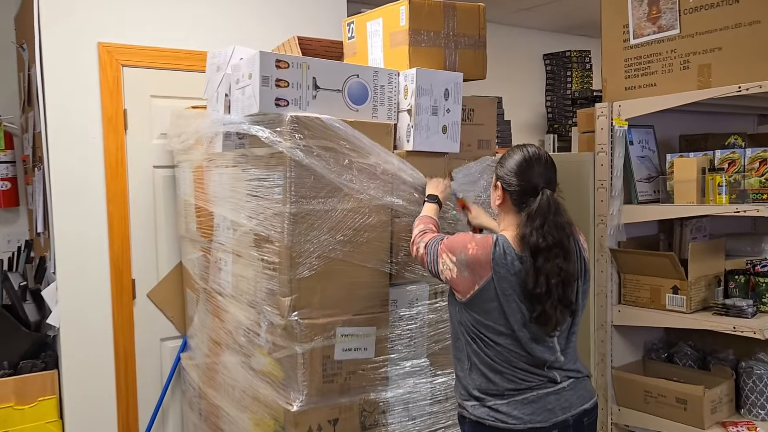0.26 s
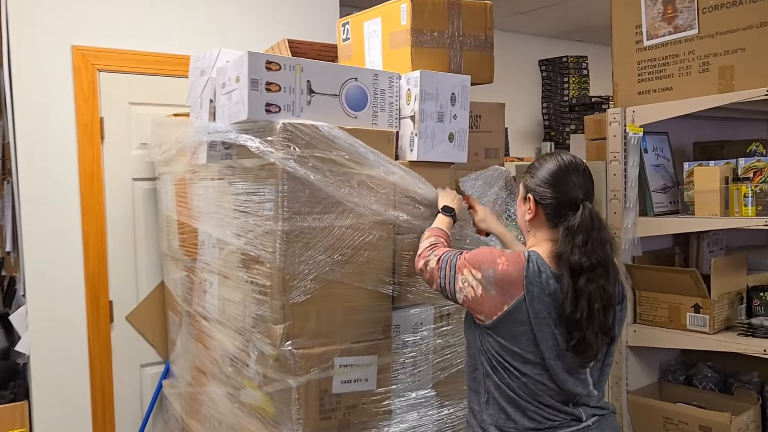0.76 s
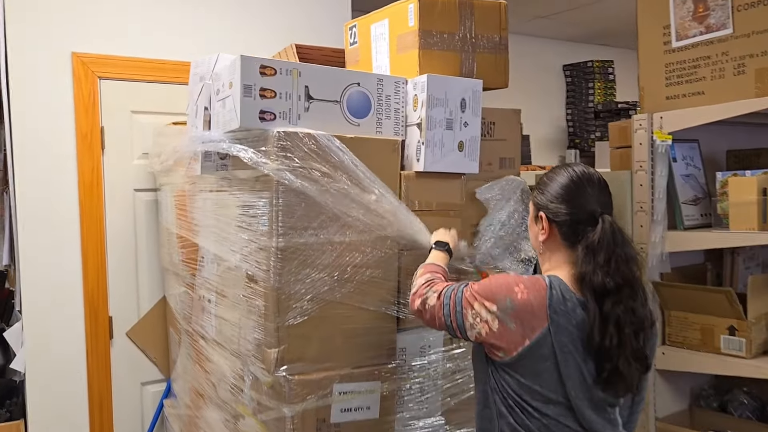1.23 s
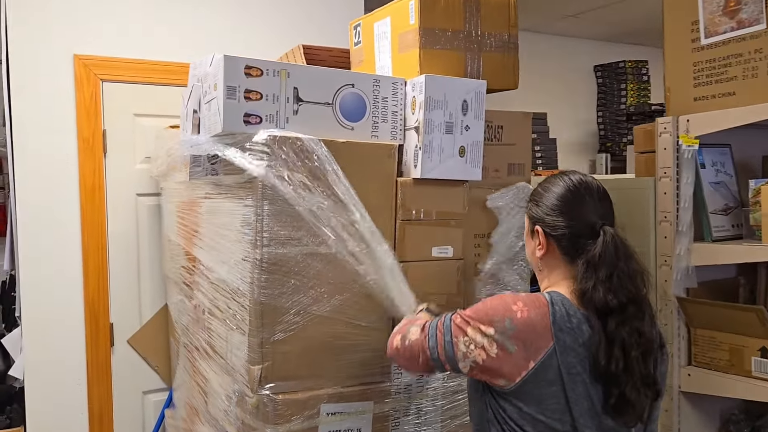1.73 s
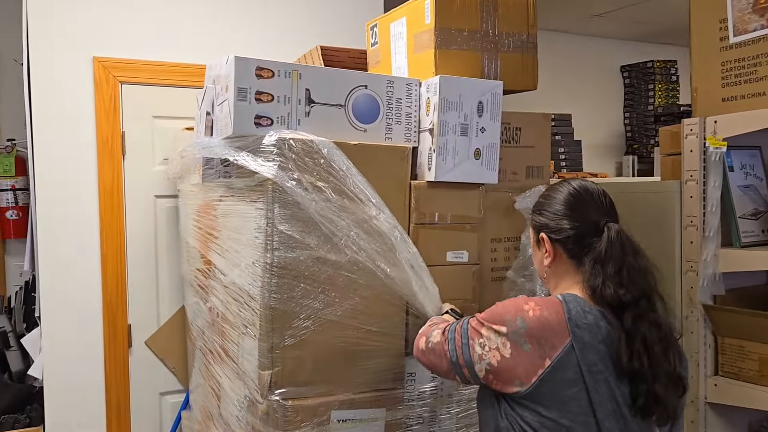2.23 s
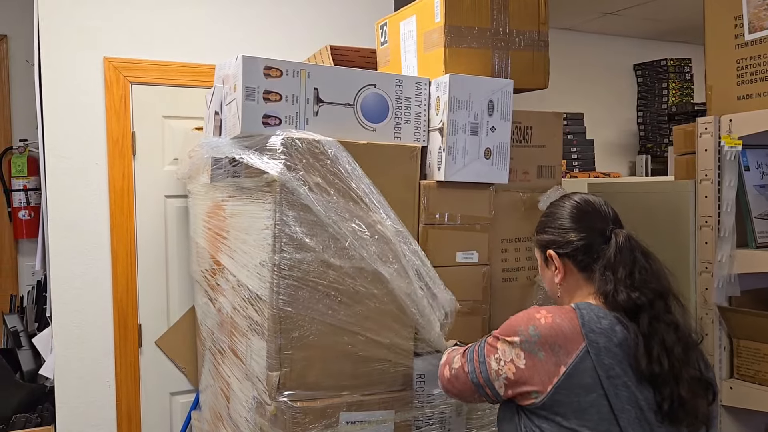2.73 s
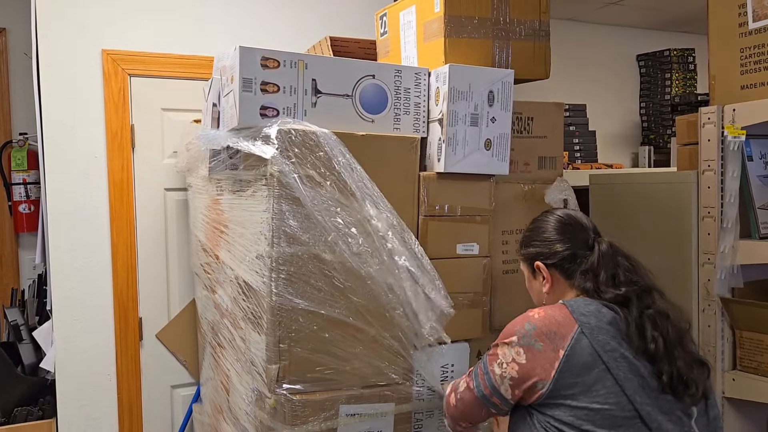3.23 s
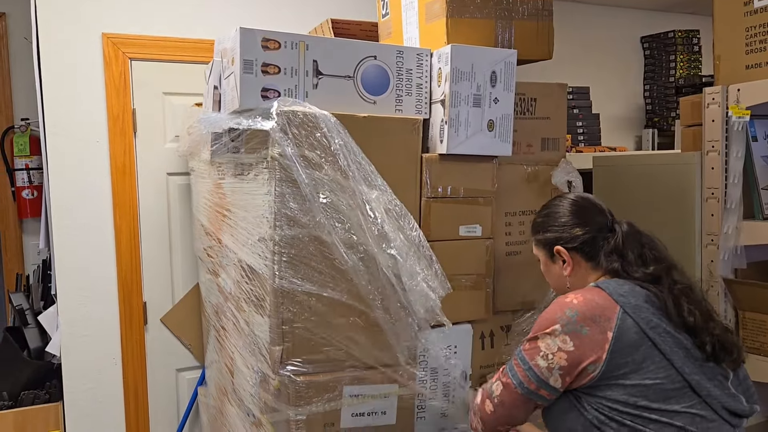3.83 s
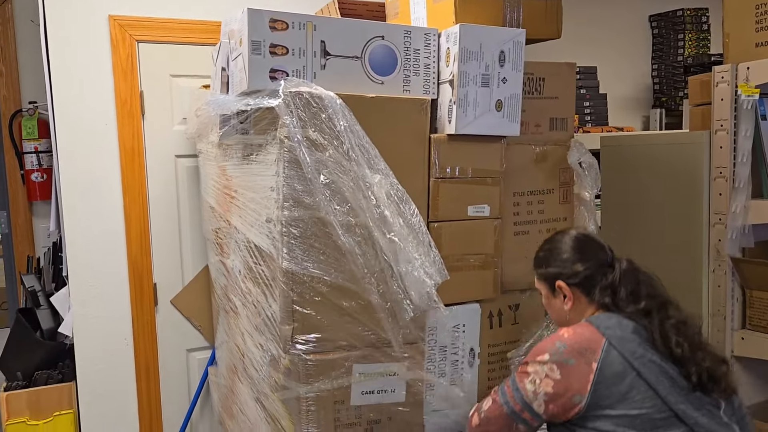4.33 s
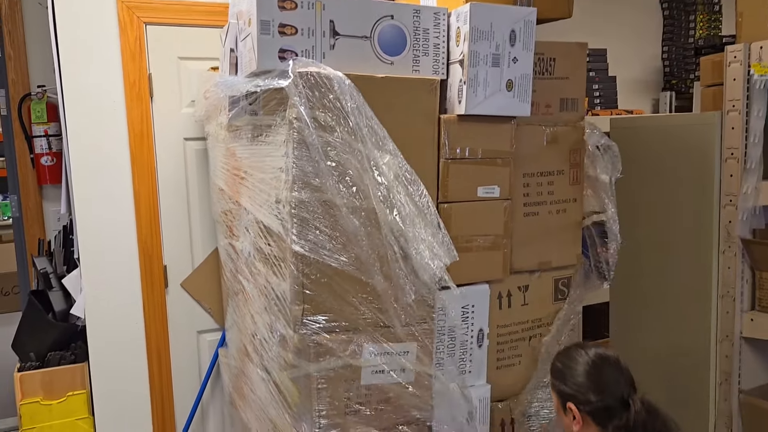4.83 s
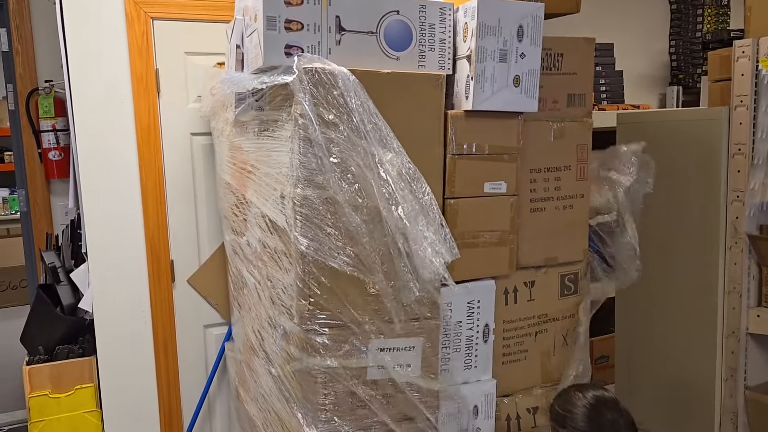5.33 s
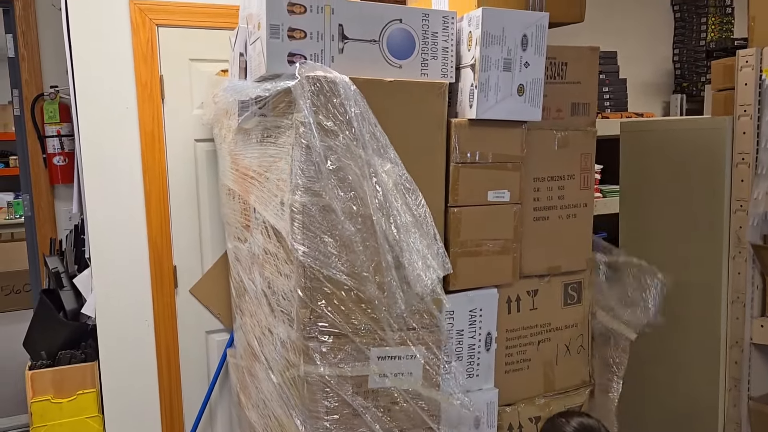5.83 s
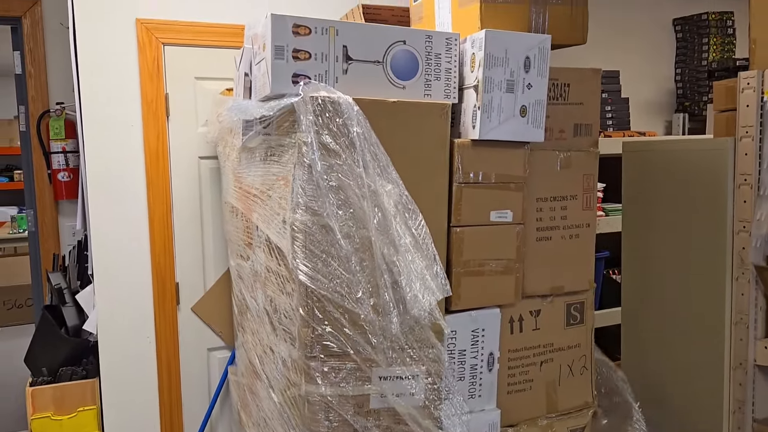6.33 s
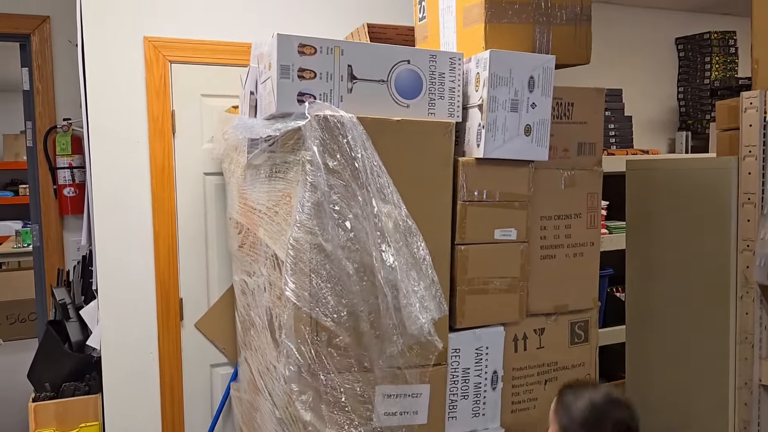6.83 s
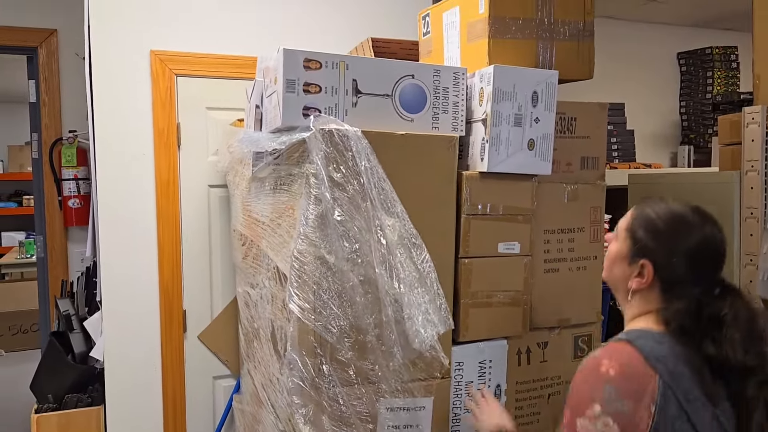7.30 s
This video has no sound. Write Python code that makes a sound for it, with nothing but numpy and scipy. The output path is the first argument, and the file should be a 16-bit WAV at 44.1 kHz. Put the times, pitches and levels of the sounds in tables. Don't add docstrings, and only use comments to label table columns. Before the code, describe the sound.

A woman tears stretch film off a pallet of boxes in a small storeroom, a few steps from a stereo microphone. Dense crinkling comes in uneven tugs, with wads crunching in the hand, folds popping and small creases ticking. Hollow cartons boom softly and the load rumbles. The loudest crackles come just before two seconds and between about five and seven, then it thins to faint ticks.

```python
import sys
import numpy as np
from scipy import signal
from scipy.fft import rfft, irfft, next_fast_len
from scipy.io import wavfile

SR = 44100
rng = np.random.default_rng(int(sys.argv[2]) if len(sys.argv) > 2 else 0)


def magnitude_from_level(level_db):
    exponent = np.asarray(level_db, float) / 20
    return 10 ** exponent


def put_to_file(sound):
    columns = np.atleast_2d(sound).T
    safe = np.clip(columns, -1, 1)
    whole_steps = np.round(safe * 32767)
    wavfile.write(sys.argv[1], SR, whole_steps.astype(np.int16))


N = 333396
HOP = 20

# peak_s, crackle_db, rise_s, fall_s,
# load_db
HAND_TUGS = [(0.0, -42, .01, 0.12, -25), (.194, -32, 0.064, 0.2, -7), (.398, -30.5, 0.03, 0.41, -7.5),
             (0.949, -33, 0.013, 0.62, -11), (1.128, -31, 0.078, 0.24, -10),
             (1.33, -30, 0.4, 0.16, -7.5), (1.728, -20.5, 0.0037, 0.033, -5),
             (1.766, -24, 0.014, 0.12, -5), (1.837, -22, 0.02, 0.061, -1.5), (1.87, -32, 0.03, 0.2, -9),
             (2.232, -40.5, 0.37, 0.21, 4), (2.298, -31, 0.0023, 0.14, 0),
             (2.491, -31, 0.081, 0.4, -9.5), (2.973, -34.5, 0.0084, .3, -20),
             (3.055, -27.5, 0.043, 0.38, -12), (3.28, -33.5, 0.074, 0.052, 9.5),
             (3.505, -31.5, 0.049, 0.084, -15), (3.932, -23.5, 0.079, 0.13, -4.5),
             (4.327, -29.5, 0.033, 0.25, -7), (4.384, -27.5, 0.053, 0.078, -19),
             (4.674, -36, 0.19, 0.15, -27),
             (4.794, -30.5, 0.069, 0.32, -3), (4.993, -24, 0.0037, 0.12, -14),
                 (5.217, -23.5, 0.1, 0.34, -11.5), (5.467, -21.5, 0.0019, 0.062, 3),
                 (5.522, -25, .005, 0.15, -3), (5.576, -26.5, 0.1, 0.16, -13),
                 (5.759, -31, 0.004, 0.05, -8), (5.81, -39.5, .08, 0.11, -4),
                 (5.874, -25, 0.0033, 0.11, -10), (5.924, -27, 0.05, 0.045, -5),
                 (5.987, -30, .002, 0.039, -10), (6.0765, -26.5, 0.002, 0.025, -15),
                 (6.104, -30, .002, 0.042, -12), (6.237, -35.5, 0.11, 0.13, -5.5),
                 (6.555, -21, 0.0022, 0.2, -6), (6.605, -19.5, 0.062, 0.057, -8.5),
                 (6.76, -35, 0.15, 0.35, -8), (6.857, -32, 0.096, 0.12, 1), (6.935, -36, 0.25, 0.047, -24),
                 (7.09, -39, 0.26, 0.17, -7), (7.451, -46, 0.0044, 0.31, -36), (7.56, -37, 0.068, .1, -5),
             (0.424, -27.5, 0.13, 0.05, -7.5), (1.027, -31, .002, 0.11, 8.5),
               (1.171, -28, 0.0066, 0.13, -10), (3.004, -31, .002, .06, -11),
               (.524, -31.5, .002, 0.12, -14), (.262, -33, .002, 0.057, -14), (0.606, -34, .003, .1, -5),
               (3.887, -34, .002, 0.04, -6), (6.966, -32, .004, 0.033, -23), (6.994, -31.5, .004, .03, -15),
               (1.55, -35.5, 0.062, 0.07, -2), (2.62, -39.5, 0.28, 1, -15), (3.34, -33, 0.038, 0.07, -12),
               (3.6, -42, 0.056, 0.42, 0), (3.74, -38, 0.11, 0.14, -40), (4.035, -34.5, 0.11, 0.025, -28),
               (4.078, -35.5, .01, 0.019, -22), (4.85, -28, 0.1, 0.046, -9), (5.015, -40, 0.13, 0.041, -33),
               (5.167, -29, 0.0044, 0.55, -22), (5.31, -35, 0.35, 0.067, -11), (5.65, -30, .2, 0.036, -6.5),
               (6.92, -26.5, 0.1, 0.037, -17), (7.04, -33.5, 0.037, 0.098, -14)]
# time_s, crackle_db
SETTLING_FILM = [(0, -57), (.2, -27), (.7, -35), (1.7, -32.5), (2.0, -39.5), (2.9, -39), (3.45, -45),
                 (3.8, -37), (4.2, -40), (4.6, -58), (5.7, -44), (6.1, -40), (6.45, -44.5), (7.0, -47),
                 (7.3, -56), (7.56, -49)]
SETTLING_GAIN_DB, SETTLING_LOAD_DB = -7, -23

# pitch_hz, level_db (per Hz)
FILM_COLOUR = [(880, -44), (1500, -12), (2040, -1.5), (2670, -4), (3770, 1.5), (6500, -2), (8450, -15),
               (14300, -120)]
FINE_COLOUR = [(3820, -14.5), (6500, -3.5), (7310, 1), (9090, -2), (11000, -4), (12400, -1.5),
               (14800, -0.5), (15600, 5), (16000, -22)]
COARSE_COLOUR = [(260, -10.5), (450, -13), (591, -1), (902, -1.5), (987, -2.5), (1500, -1), (1950, -23),
                 (3300, -120)]
CARTON_COLOUR = [(65, -59), (110, -18), (204, -3), (242, -7.5), (323, -2.5), (450, -19.5), (580, -8),
                 (990, -120)]
MEAN_PULL_DB = -35
FINE_DB, FINE_PER_PULL = -2.5, -0.068
COARSE_DB, COARSE_PER_LOAD = -4.5, 0.25

# peak_s, level_db, rise_s, fall_s, pitch_hz
WAD_CRUNCHES = [(.345, -32, 0.028, 0.027, 1450), (.42, -29.5, .04, .04, 3500), (.46, -33, .03, 0.044, 2000),
                (1.77, -24, .02, .05, 2200), (3.06, -31.5, 0.033, 0.064, 1500),
                (3.14, -32.5, 0.063, 0.038, 1600), (3.505, -38, .04, .04, 4100),
                (3.85, -41, .04, 0.032, 815), (4.16, -46, .015, 0.033, 800), (4.36, -38, .04, .04, 1750),
                (4.53, -42.5, 0.021, .06, 700), (4.665, -39, 0.037, .03, 885),
                (4.81, -31, 0.058, .08, 1800), (4.885, -35, 0.022, 0.025, 800),
                (5.12, -44, .05, 0.051, 1090), (6.15, -40, .012, 0.032, 600),
                (6.25, -32.5, 0.046, 0.039, 1680), (6.34, -45, .2, 0.31, 12500),
                (1.74, -35, .015, .08, 800), (5.6, -39, .08, .08, 5600), (2.3, -34, .002, 0.035, 4500),
                (4.16, -42, 0.016, .04, 500), (6.69, -30, .05, 0.11, 2030), (7.468, -40, .03, 0.033, 3670),
                (7.47, -35, 0.027, 0.048, 13500), (7.55, -45, .03, .05, 1500)]
CRUNCH_Q = 3.5

# start_s, peak_db, pitch_hz
FOLD_POPS = [(0.115, -25, 3940), (0.2614, -11, 1900), (0.326, -23, 1440), (.397, -35, 1320),
             (1.131, -15, 4150), (1.764, -10.5, 1290), (1.836, -10, 720), (2.2983, -11.5, 730),
             (2.488, -11, 2470), (2.872, -28, 1550), (3.321, -34, 1600), (3.48, -28, 2210),
             (3.605, -19.5, 2300), (3.72, -21, 4960), (4.289, -22, 1800), (4.32, -8.5, 3860),
             (4.37, -14, 1800), (4.772, -19, 3060), (4.87, -13, 905), (4.994, -13, 930), (5.043, -18, 970),
             (5.016, -18, 880), (5.465, -3.5, 940), (5.467, -8, 2600), (6.149, -29, 795),
             (6.511, -24, 5800), (6.553, -11, 1270), (7.311, -29, 5500), (7.414, -29, 5560)]
# start_s, peak_db
FLAP_TAPS = [(2.302, -12), (5.758, -17), (5.875, -8.5), (5.9543, -7.5), (5.9844, -8), (6.0744, -9),
             (6.1032, -13), (6.191, -37), (6.22, -25), (6.733, -14), (6.758, -14), (6.811, -18),
             (6.838, -18.5), (6.963, -24), (7.028, -22)]
# start_s, peak_db, pitch_hz, crack_db (over the peak)
STRAND_TEARS = [(.192, -15, 3100, 11), (1.026, -22.5, 1190, 20.5), (1.172, -15, 3500, 13),
                (5.047, -15, 3000, -3), (1.726, -10.5, 2330, 12.5), (2.464, -17.5, 4180, 11.5),
                (2.576, -15.5, 2300, 13), (2.972, -23, 1710, -6), (3.093, -15.5, 1720, 16),
                (3.246, -14.5, 2200, 13.5), (3.652, -15.5, 3100, 13.5), (3.932, -10, 960, 8),
                (5.097, -19, 1080, 14), (5.165, -21, 840, 5), (5.522, -27, 789, 27), (7.186, -35, 900, 16),
                (7.449, -31, 4200, 28)]
# start_s, peak_db, pitch_hz
CREASE_TICKS = [(0.409, -14, 3190), (0.4204, -13, 3790), (0.448, -17, 2090), (0.5227, -14, 3830),
                (0.606, -23, 2180), (0.9433, -18, 4400), (1.8674, -6, 2470), (1.8945, -9, 1820),
                (1.9794, -26, 2120), (2.0494, -32, 1980), (2.1545, -29, 3320), (3.004, -21, 2430),
                (3.063, -9, 1910), (3.1294, -9, 2380), (3.8861, -19, 4640), (3.909, -11, 1900),
                (3.9204, -12, 3880), (4.077, -26, 2350), (4.3517, -15, 1680), (4.6344, -25, 2010),
                (4.6659, -19, 1830), (4.7894, -12, 2110), (4.9467, -23, 1720), (5.1467, -16, 2740),
                (5.1657, -13, 3580), (5.243, -15, 1960), (5.4253, -17, 1830), (5.4954, -25, 2800),
                (5.6462, -13, 2000), (5.6614, -16, 1890), (5.7169, -24, 5490), (5.746, -20, 1980),
                (6.1918, -30, 1520), (6.4166, -16.5, 5610), (6.9634, -15, 2100), (6.991, -23, 1990),
                (7.1008, -23, 3740), (7.113, -17, 3740), (7.1274, -26, 1870), (7.1444, -34, 2120),
                (7.1866, -13, 4460), (7.2294, -40, 1530), (7.2594, -25, 4130), (7.3274, -40, 6570),
                (7.3647, -23, 5560), (7.4674, -28, 3710)]
FOLD_CLICK, FOLD_CYCLES = 5.5, 7.5
TAP_CLICK, TAP_CYCLES = 16., 13.
TICK_CLICK, TICK_CYCLES = 10., 5.
POP_CRACK_DB, POP_T60_S = -22, .03
TAP_CRACK_DB, TAP_T60_S, TAP_HZ = -11, .026, 2000
TICK_CRACK_DB, TICK_T60_S, TICK_LOSS_DB = -1, .02, -2
TEAR_T60_S = .038
RATTLE_PER_CLICK = 1.7

# start_s, peak_db, pitch_hz, t60_s
CARTON_KNOCKS = [(1.099, -8.5, 222, 0.037), (1.17, -12, 327, 0.097), (1.723, -23, 206, 0.27),
                 (1.835, -11.5, 278.4, 0.16), (2.173, -18, 196, 0.063), (2.296, -15.5, 255, 0.15),
                 (2.507, -16, 230, 0.12), (2.615, -19, 223, 0.083), (2.256, -23, 262, 0.072),
                 (0.734, -31, 123, 0.15), (2.968, -24, 203, 0.13), (3.276, -17, 215, 0.12),
                 (3.846, -24.5, 258, 0.068), (3.888, -27, 290, 0.091), (3.918, -10, 232, 0.11),
                 (4.029, -29, 278, .08), (4.448, -34, 314, .08), (4.54, -29, 250, 0.091),
                 (4.664, -29, 302, .06), (4.82, -22, 229, .12), (4.15, -26, 325, 0.15),
                 (4.316, -20.5, 201.6, 0.3), (4.37, -20.5, 215, 0.18), (4.777, -22.5, 211, 0.34),
                 (4.996, -27, 197, 0.13), (5.141, -15, 332, 0.12), (5.464, -22, 312, 0.21),
                 (5.523, -38, 196.4, 0.061), (5.871, -17.5, 214, 0.1), (6.07, -47, 346, 0.12),
                 (6.232, -23, 381, 0.11), (6.555, -21, 194, 0.21), (6.603, -8.5, 174, 0.11),
                 (6.841, -17.5, 153, 0.11)]

# time_s, pitch_hz (strongest line), level_db
PEEL_SQUEAKS = [
    [(0.2, 1350, -37), (0.225, 1362, -34.5), (.255, 1402, -46), (0.285, 1434, -38), (.318, 1420, -44),
     (.345, 1400, -41), (0.4, 1331, -46), (0.48, 1436, -42)],
    [(5.18, 841.9, -33), (5.2, 900, -25), (5.24, 920, -33)],
    [(6.665, 2080, -39), (6.689, 2050, -39.5), (6.753, 2026, -45), (6.78, 1928, -37)],
    [(5.28, 1700, -32), (5.305, 1665, -36.5), (5.335, 1810, -35)],
]
# multiple (of the strongest line), level_db
SQUEAK_LINES = [
    [(.5, -5.5), (1, 3.5), (1.5, 2), (2.5, -1)],
    [(1, -2.5)],
    [(1, 7)],
    [(1, 4), (1.5, -1)],
]

# peak_s, level_db
LOAD_LURCHES = [(.42, -50.5), (.76, -52), (1.11, -37), (1.85, -43), (2.55, -47), (3.16, -47.5), (3.98, -52),
                (4.36, -47.5), (4.86, -45.5), (5.26, -41), (5.498, -34.5), (5.9, -42.5), (6.28, -49),
                (.22, -56), (2.35, -52), (2.98, -55), (6.61, -35.5), (6.9, -49)]
LURCH_RISE_S, LURCH_FALL_S = 0.071, 0.18

# pitch_hz, level_db (per Hz)
AIR_COLOUR = [(15, -49), (25, -22), (344, 4.5), (463, -14), (607, 0), (911, -4.5), (5430, -3.5),
              (11000, -10), (14800, -8), (16000, -16)]
AIR_DB = -50.5
ROOM_T60_S, ROOM_DB, WALL_CUT_HZ = 0.12, -13.5, 20000

# pitch_hz, width_db (side over mid)
STEREO_WIDTH = [(60, -18), (110, -10.5), (200, -24), (380, -15), (700, -11), (1290, -4), (2380, -5),
                (4400, 0), (8120, 0), (15000, 0)]
# pitch_hz, lean_db (left over right)
STEREO_LEAN = [(60, -1), (700, .1), (1300, -.8), (2400, 1.2), (4400, 2.4), (8000, -.6), (15000, .8)]
PORT_NOTCH_HZ, PORT_NOTCH_Q, PORT_NOTCH_SHARE = 11100, 9, 0.49
CUTOFF_HZ = 15750


def crackle():
    film_db, fine_db, coarse_db, carton_db = tugs()
    starts = (rng.random(N) < 70 / SR) * rng.random(N)
    dying = signal.lfilter([1], [1, -magnitude_from_level(-60 / (.03 * SR))], starts)
    bursts = rms_one(1 + .4 * dying)
    shared = buckles(3500, spread_db=2.9, clump_db=1.1)
    own = buckles(6000, spread_db=1.5, clump_db=1.5)
    film = magnitude_from_level(-1.0) * colour(shared + 0.36 * taut_patches(shared, cycles=30.), FILM_COLOUR)
    fine = magnitude_from_level(fine_db) * colour(shared + 0.72 * own, FINE_COLOUR)
    coarse = magnitude_from_level(coarse_db - 1.0) * colour(shared + 0.33 * own, COARSE_COLOUR)
    carton = magnitude_from_level(carton_db - 2.0) * colour(own, CARTON_COLOUR)
    return magnitude_from_level(film_db) * bursts * (film + fine + coarse + carton)


def tugs():
    power = magnitude_from_level(in_time(SETTLING_FILM)[0][::HOP] + SETTLING_GAIN_DB) ** 2
    load = power * SETTLING_LOAD_DB
    for *shape, load_db in HAND_TUGS:
        tug = swell(*shape)
        power = power + tug
        load = load + load_db * tug
    film_db = every_sample(10 * np.log10(power))
    carton_db = every_sample(load / power)
    fine_db = FINE_DB + FINE_PER_PULL * (film_db - MEAN_PULL_DB)
    coarse_db = COARSE_DB + COARSE_PER_LOAD * carton_db
    return film_db, fine_db, coarse_db, carton_db


def swell(peak_s, peak_db, rise_s, fall_s):
    t = np.arange(0, N, HOP) / SR - peak_s
    return magnitude_from_level(peak_db - 20 * np.maximum(-t / rise_s, t / fall_s)) ** 2


def buckles(per_s, spread_db, clump_db):
    size_db = spread_db * np.minimum(rng.exponential(1, N), 4)
    clumps_db = clump_db * np.minimum(drift(25), 1.5)
    flips = rng.random(N) < per_s / SR
    signs = np.sign(rng.random((2, N)) - .5)
    return magnitude_from_level(size_db + clumps_db) * flips * signs


def taut_patches(clicks, cycles):
    pitches = np.geomspace(1500, 6200, 12)
    patch = rng.integers(0, 12, N)
    return sum(ring(clicks * (patch == k) + 1e-18, hz, cycles / hz) for k, hz in enumerate(pitches))


def crunches():
    creases = rms_one(buckles(3000, spread_db=3., clump_db=1.))
    out = np.zeros((2, N))
    for *shape, hz in WAD_CRUNCHES:
        peak_s = shape[0]
        near = slice(max(round((peak_s - .3) * SR), 0), round((peak_s + .3) * SR))
        ringing = signal.lfilter(*signal.iirpeak(hz, CRUNCH_Q, SR), creases[:, near])
        squeeze = every_sample(np.sqrt(swell(*shape)))
        out[:, near] += squeeze[near] * rms_one(ringing)
    return out


def snaps():
    out, t = np.zeros((2, N + SR)), np.arange(SR // 16) / SR
    first = np.arange(len(t)) == [[0], [3]]
    bright = signal.butter(2, 2800, "high", fs=SR, output="sos")
    for start_s, peak_db, hz, crack_db, t60, click, cycles in all_folds():
        noise = rng.standard_normal((2, len(t)))
        rattle = noise * magnitude_from_level(-60 * t / t60) + click * first
        patch = ring(rattle, hz, cycles / hz)
        broad = signal.butter(2, [0.93 * hz, 7000], "band", fs=SR, output="sos")
        body = patch / np.abs(patch).max() + RATTLE_PER_CLICK / click * signal.sosfilt(broad, rattle)
        crack = magnitude_from_level(crack_db - 17.0) * signal.sosfilt(bright, rattle)
        out[:, round(start_s * SR):][:, :len(t)] += magnitude_from_level(peak_db - 1.0) * (body + crack)
    return out[:, :N]


def all_folds():
    pops = [(*row, POP_CRACK_DB, POP_T60_S, FOLD_CLICK, FOLD_CYCLES) for row in FOLD_POPS]
    taps = [(s, db, TAP_HZ, TAP_CRACK_DB, TAP_T60_S, TAP_CLICK, TAP_CYCLES) for s, db in FLAP_TAPS]
    tears = [(*row, TEAR_T60_S, FOLD_CLICK, FOLD_CYCLES) for row in STRAND_TEARS]
    ticks = [(s, db + TICK_LOSS_DB, hz, TICK_CRACK_DB, TICK_T60_S, TICK_CLICK, TICK_CYCLES)
             for s, db, hz in CREASE_TICKS]
    return pops + taps + tears + ticks


def knocks():
    out, t = np.zeros(N + SR), np.arange(SR // 2) / SR
    push = np.exp(-t / 0.00066) * t
    for start_s, peak_db, hz, t60 in CARTON_KNOCKS:
        boom = ring(push, hz, t60) + 0.06 * ring(push, 3.2 * hz, 1.1 * t60)
        out[round(start_s * SR):][:len(t)] += magnitude_from_level(peak_db - 8.5) * boom / np.abs(boom).max()
    return out[:N]


def squeaks():
    out, t = np.zeros(N), np.arange(N) / SR
    wobble, throb = drift(143), drift(110)
    for rows, lines in zip(PEEL_SQUEAKS, SQUEAK_LINES):
        hz, level_db = in_time(rows)
        phase = 2 * np.pi * np.cumsum(hz * (1 + 0.0417 * wobble)) / SR
        stack = sum(magnitude_from_level(db) * np.sin(multiple * phase) for multiple, db in lines)
        to_nearest_end = np.minimum(t - rows[0][0], rows[-1][0] - t)
        fade = np.clip(to_nearest_end / 0.0073, 0, 1)
        out += fade * magnitude_from_level(level_db + 1.5 + 4 * throb) * stack
    return out


def rumble():
    low = signal.butter(2, [32, 95], "band", fs=SR, output="sos")
    power = sum(swell(s, db, LURCH_RISE_S, LURCH_FALL_S) for s, db in LOAD_LURCHES)
    sway = every_sample(np.sqrt(power))
    return sway * rms_one(signal.sosfilt(low, rng.standard_normal((2, N))))


def storeroom(x):
    size = next_fast_len(N + SR)
    hz = np.fft.rfftfreq(size, 1 / SR)
    tail = 0
    for k, lag_s in enumerate(rng.uniform(0.0082, .032, 8)):
        delay = np.exp(-2j * np.pi * hz * lag_s)
        loop = magnitude_from_level(-60 * lag_s / ROOM_T60_S) * delay / (1 + 1j * hz / WALL_CUT_HZ)
        tail = tail + (-1) ** k * loop / (1 - loop)
    return irfft(rfft(x, size) * tail, size)[:, :N]


def still_air():
    return magnitude_from_level(AIR_DB) * colour(rng.standard_normal((2, N)), AIR_COLOUR)


def two_ports(sum_and_difference):
    hz = np.fft.rfftfreq(N, 1 / SR)
    mid, side = rfft(sum_and_difference)
    side = side * magnitude_from_level(at_hz(STEREO_WIDTH, hz))
    lean = magnitude_from_level(at_hz(STEREO_LEAN, hz) / 2)
    return irfft(np.array([(mid + side) * lean, (mid - side) / lean]), N)


def ring(x, hz, t60):
    r, w = magnitude_from_level(-60 / (t60 * SR)), 2 * np.pi * hz / SR
    return signal.lfilter([0, np.sin(w)], [1, -2 * r * np.cos(w), r * r], x)


def colour(x, spectrum):
    gain = magnitude_from_level(at_hz(spectrum, np.fft.rfftfreq(N, 1 / SR)))
    return rms_one(irfft(rfft(x) * gain, N))


def drift(rate_hz):
    r = np.exp(-2 * np.pi * rate_hz * HOP / SR)
    noise = rng.standard_normal(N // HOP + 2002)
    slow = signal.lfilter([1], [1, -2 * r, r * r], noise)[2000:]
    return np.interp(np.arange(N) / HOP, np.arange(len(slow)), rms_one(slow))


def rms_one(x):
    return x / np.sqrt(np.mean(x ** 2) + 1e-20)


def in_time(rows):
    s, *columns = np.transpose(rows)
    return [np.interp(np.arange(N) / SR, s, c) for c in columns]


def every_sample(coarse):
    return np.interp(np.arange(N), np.arange(0, N, HOP), coarse)


def at_hz(points, hz):
    point_hz, db = np.transpose(points)
    return np.interp(np.log(hz + 1), np.log(point_hz), db)


def scene():
    film = crackle() + crunches() + snaps() + (knocks() + squeaks()) * [[1], [.6]]
    no_bass = signal.butter(4, 105, "high", fs=SR, output="sos")
    film = signal.sosfilt(no_bass, film)
    return two_ports(film + magnitude_from_level(ROOM_DB) * storeroom(film) + rumble() + still_air())


def low_pass(x):
    return signal.sosfilt(signal.butter(12, 16850, fs=SR, output="sos"), x)


def record(dry):
    notch_band = signal.lfilter(*signal.iirpeak(PORT_NOTCH_HZ, PORT_NOTCH_Q, SR), dry)
    dipped = dry - PORT_NOTCH_SHARE * notch_band
    rounded = .85 * np.tanh(dipped / .85)
    cut = signal.sosfilt(signal.cheby2(16, 60, CUTOFF_HZ, fs=SR, output="sos"), rounded)
    return low_pass(cut)


dry = scene()
out = record(dry)
put_to_file(out)
```